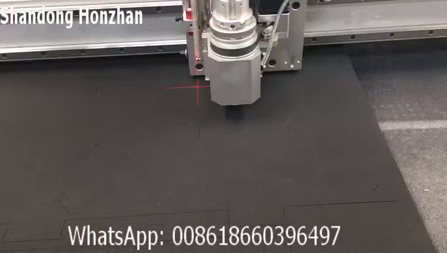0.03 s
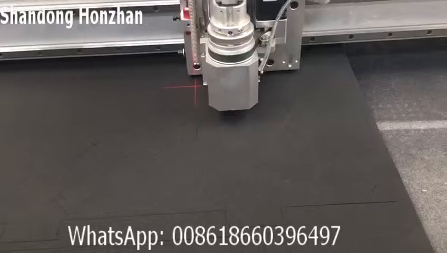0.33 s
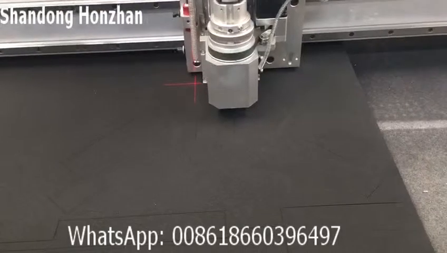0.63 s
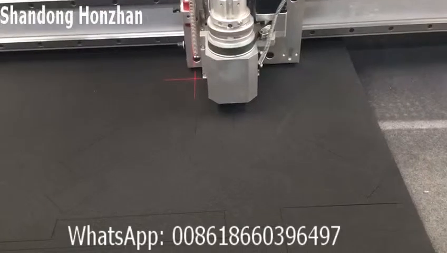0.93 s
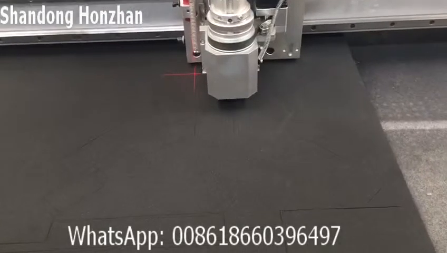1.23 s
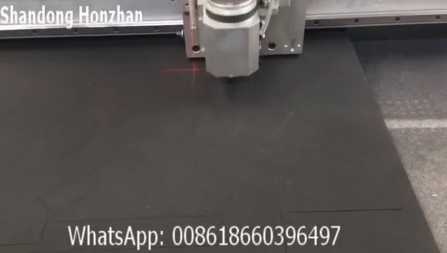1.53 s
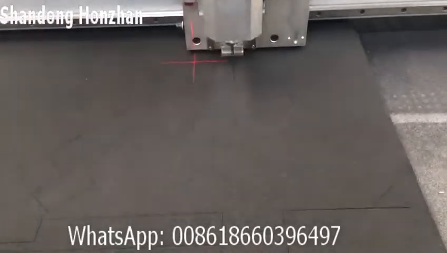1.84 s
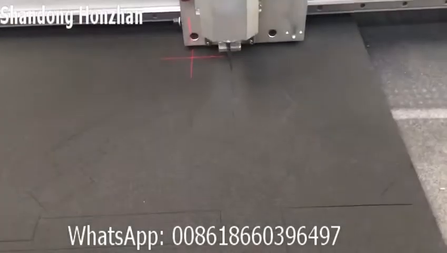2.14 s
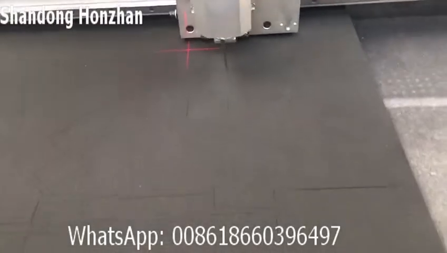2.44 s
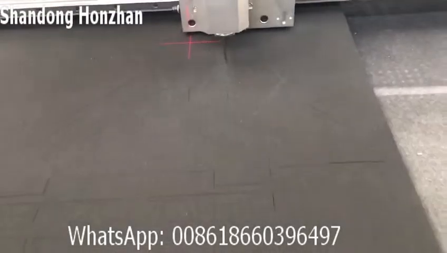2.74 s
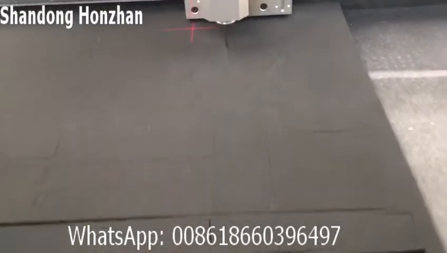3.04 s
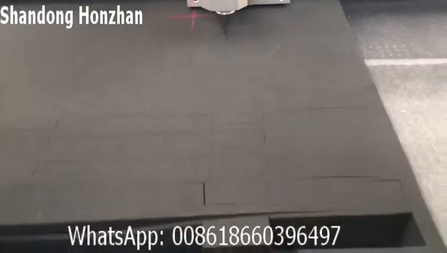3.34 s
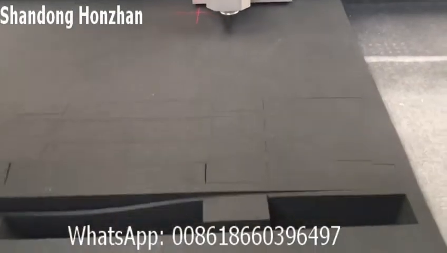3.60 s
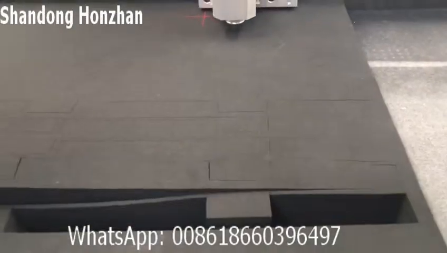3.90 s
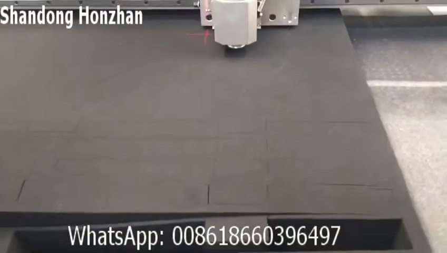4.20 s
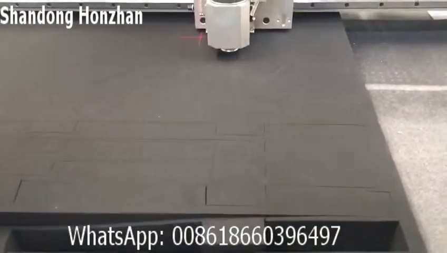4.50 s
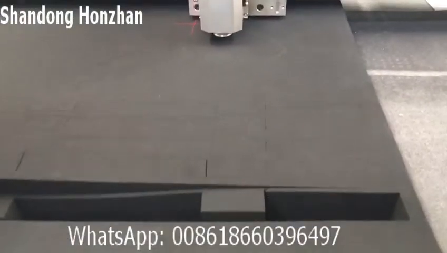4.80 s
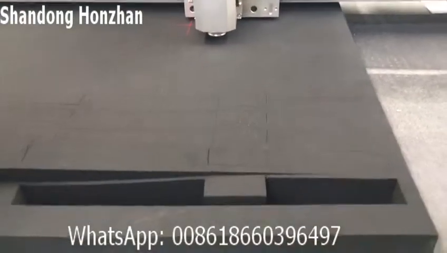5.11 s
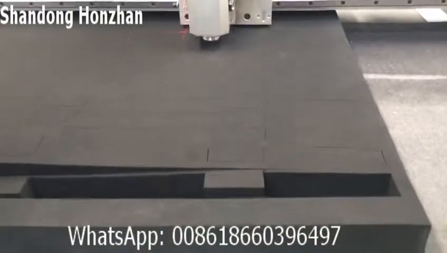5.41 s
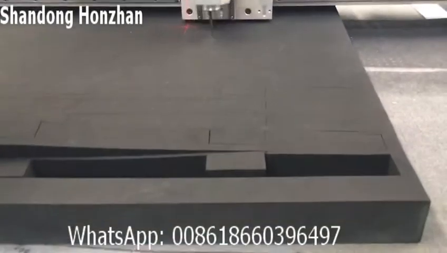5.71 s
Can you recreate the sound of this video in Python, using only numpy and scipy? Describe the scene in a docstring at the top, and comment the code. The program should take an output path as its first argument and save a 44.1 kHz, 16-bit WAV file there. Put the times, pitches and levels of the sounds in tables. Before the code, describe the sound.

An oscillating knife machine cuts foam with a fast, steady chatter over a low vacuum drone and fuzzy motor whines.

```python
"""Oscillating knife cutting foam

A CNC table cuts a foam sheet at about 21 strokes a second, over the drone of its vacuum bed.
The knife knocks and chatters at both ends of each stroke, rasps in its guide and drags in the foam.
The gantry shakes, and fuzzy drive whines shift as the head travels. A narrow-band recorder that
drops samples mirrors the whole sound into a thin sizzle high in the treble."""
import sys
import numpy as np
from scipy import signal
from scipy.fft import rfft, irfft, next_fast_len
from scipy.io import wavfile
from scipy.ndimage import uniform_filter1d

SR = 44100
rng = np.random.default_rng(int(sys.argv[2]) if len(sys.argv) > 2 else 0)


def inscribe(sig):
    """Save sig as 16-bit PCM at rate SR to the path in sys.argv[1].

    A 1-D sig is mono; a 2-D sig holds one channel per row.
    Samples are clipped to [-1, 1] before scaling.
    """
    pcm = np.round(np.clip(np.atleast_2d(sig).T, -1, 1) * 32767)
    wavfile.write(sys.argv[1], SR, pcm.astype(np.int16))


N = 262395
TIME = np.arange(N) / SR
SKIP_S = 5.423  # the sound jumps half a stroke here

# tone colour of the air rushing through the bed: f/Hz, relative level/dB
RUSH_SPECTRUM = [(8, -13), (20, 1), (35, -4.5), (70, -6), (103, -3.5), (122, -10.5), (140, -15),
                 (250, -18.5), (370, -17), (480, -15.5), (600, -12.5), (850, -19), (1150, -18),
                 (1900, -15.5), (2500, -15), (3200, -16)]
# irregular swells and dips in the loudness of the low drone: t/s, gain/dB
DRONE_LEVEL = [(.4, -3), (.68, 0.5), (.82, -2.5), (1.03, 4.5), (1.25, 1), (1.42, -7.5), (1.72, 7.5),
               (1.85, 1), (2.3, 1), (2.45, -8), (2.58, 3), (3.3, -4), (3.65, 2), (4.05, -1.5), (4.6, 2.5),
               (4.77, -8.5), (5.08, 4.5), (5.6, -9), (5.82, 6.5), (5.95, 2)]
# shaking of the gantry: multiple of the stroke rate, level/dB
SHAKE_HARMONICS = [(1, -49), (2, -59.5), (3, -57), (4, -55.5), (5, -70.5), (6, -61.5)]
# resonances of the cutting head: f/Hz, width/Hz, level/dB
HEAD_MODES = [(778, 32, -68.5), (960.5, 42, -66), (1366, 120, -63.5), (1521, 160, -62.5), (1685, 93, -58.5),
              (1782, 170, -60), (2333, 130, -58)]
# the head's hum, easing after the long run across the sheet: t/s, gain/dB
HUM_FADER = [(.4, -1.5), (1.2, -0.5), (1.5, 0), (3.2, 0), (4.4, 0), (4.9, 1), (5.2, -1), (5.95, -4.5)]
# low drive whine, strongest on the long run: t/s, f/Hz, level/dB
LOW_DRIVE = [(.4, 2050, -58.5), (1.1, 2017, -55), (1.6, 2020, -57.5), (1.9, 2007, -53.5), (2.25, 2012, -55),
             (3, 2054, -50.8), (3.5, 2050, -51.5), (4.05, 2018, -54), (4.25, 2036, -51), (4.8, 2054, -53),
             (4.97, 2013, -62.5)]
# middle drive whine, swelling and sliding down near the end: t/s, f/Hz, level/dB
MID_DRIVE = [(.45, 2200, -49), (.8, 2222, -55), (1.05, 2225, -50.5), (1.3, 2223, -52), (2.2, 2215, -55.5),
             (2.5, 2250, -61.5), (2.75, 2278, -57.5), (3.8, 2281, -56), (4.1, 2271, -57),
             (4.8, 2269, -58.5), (4.95, 2260, -50), (5.25, 2145, -48), (5.45, 2115, -53.5),
             (5.95, 2103, -52.5)]
# faint top drive whine with one brief squeal: t/s, f/Hz, level/dB
TOP_DRIVE = [(.4, 2454, -60), (3, 2451, -66), (4.8, 2450, -57.5), (5.1, 2430, -54.5), (5.36, 2436, -64),
             (5.48, 2524, -50), (5.62, 2485, -59)]
# steady hollow under the low whine: f/Hz, width/Hz, depth/0-1
STEADY_NOTCH = (1873, 43, 0.42)
# deep hollow moving just under the middle whine: t/s, f/Hz
DEEP_NOTCH = [(.4, 2094), (.9, 2140), (2.3, 2130), (2.7, 2152), (4.3, 2152), (4.85, 2150), (5.25, 1970),
              (5.6, 1915), (5.95, 1900)]
# hollow moving above the middle whine: t/s, f/Hz, depth/0-1
UPPER_NOTCH = [(.4, 2390, 0), (1.199, 2404, 0.8), (1.9, 2410, 0.7), (2.5, 2416, .05), (3.3, 2470, .5),
               (4, 2450, 0), (4.4, 2387, .45), (5, 2374, .1), (5.349, 2280, .45), (5.801, 2235, 0.7),
               (5.95, 2260, .85)]
# the blade drags in the foam: centre t/s, length/s, f/Hz, level/dB
FOAM_DRAGS = [(0.554, 0.063, 2225, -51.5), (1.434, 0.082, 1700, -55), (2.621, 0.089, 2324, -53),
              (3.372, 0.1, 1613, -53.5), (3.927, 0.093, 1723, -56.5), (4.693, 0.068, 1725, -51.5),
              (5.219, .15, 2166, -52), (5.48, 0.064, 2470, -50.5)]
# the blade rubs in its guide: f/Hz, width/Hz, level/dB
RASP_BANDS = [(609.5, 130, -59), (262.9, 220, -62.5), (1003, 1000, -59.5), (1439, 490, -56)]
# knife speed, sagging a little in mid-cut: t/s, stroke rate/Hz
STROKE_RATE = [(0.4, 20.813), (1.15, 20.61), (2.35, 20.497), (3.05, 20.609), (3.75, 20.512), (4.75, 20.566),
               (5.05, 20.782), (5.95, 20.767)]
# a thump and three chatter rings at the bottom turn, then a sharper thump and one ring at the top:
# delay after the bottom turn/strokes, f/Hz, attack/s, hold/s, decay/s, level/dB
KNIFE_RINGS = [(.001, 214.3, .0031, 0.0013, .0031, -43), (-.031, 617, .0015, .0059, .0016, -41.5),
               (.054, 487, .0046, .0011, .003, -51.5), (.066, 746, 0.0059, .0005, .0008, -50.5),
               (0.499, 203.8, 0.00064, 0.00014, 0.0041, -37), (0.5, 628, 0.00033, 0.0015, 0.0068, -49)]
# bottom turns that knock harder or softer than the rest: t/s, gain/dB
STROKE_ACCENTS = [(.52, 0.5), (1.576, 3), (1.772, 2), (1.819, 3.5), (2.648, 3), (2.76, -4), (3.09, 2.5),
                  (4.11, -4.5), (4.3, 0), (4.448, 5), (4.496, 2.2), (4.886, 2.5), (5.126, 3), (5.272, 1.4),
                  (5.319, 2), (5.37, 1), (5.729, 1.3)]
# narrow pass band of the recorder: f/Hz, gain/dB
RECORDER_BAND = [(0, 0), (2490, 0), (2540, -6), (2580, -15), (2750, -21), (2900, -32), (2990, -46),
                 (3600, -54), (9000, -62)]


def gain_of(db):
    """Decibels to amplitude."""
    return 10 ** (np.asarray(db) / 20)


def unit_rms(x):
    """Scales to rms 1."""
    return x / np.sqrt(np.mean(x ** 2) + 1e-20)


def automation(table):
    """One curve for each column after the time, in straight lines between the points."""
    times, *columns = np.transpose(table)
    return np.squeeze([np.interp(TIME, times, column) for column in columns])


def equalised(x, points):
    """Filters by a curve of (f/Hz, gain/dB) points."""
    hz, db = np.transpose(points)
    size = next_fast_len(N + 8192)
    bins = np.fft.rfftfreq(size, 1 / SR)
    curve_db = np.interp(np.log(bins + 1), np.log(hz + 1), db)
    return irfft(rfft(x, size) * gain_of(curve_db), size)[:N]


def drift(rate):
    """Random wander of rms 1 that turns about rate times a second."""
    knots = rng.standard_normal(4096)
    return unit_rms(np.interp(TIME * rate, np.arange(len(knots)), knots))


def oscillator(hz):
    """Complex tone at a steady or gliding pitch."""
    return np.exp(2j * np.pi * np.cumsum(hz * np.ones(N)) / SR)


def ringing_noise(hz, width, steady=0):
    """Noise of rms 1 in a steep resonance that may glide; steady (0-1) evens out its swells."""
    pole = np.exp(-np.pi * width / SR)
    noise = rng.standard_normal(N) + 1j * rng.standard_normal(N)
    band = signal.lfilter([1], [1, -2 * pole, pole * pole], noise)
    power = uniform_filter1d(abs(band) ** 2, size=1024) + 1e-12
    return unit_rms((band / power ** (steady / 2) * oscillator(hz)).real)


def notch(x, hz, width, depth):
    """Scoops out a narrow band that may glide."""
    carrier, pole = oscillator(hz), np.exp(-np.pi * width / SR)
    band = carrier * signal.lfilter([1 - pole], [1, -pole], x / carrier)
    return x - 2 * depth * band.real


def hollowed(x, width_hz=66):
    """Three narrow hollows around the whines: one steady, two moving."""
    upper_hz, upper_depth = automation(UPPER_NOTCH)
    x = notch(x, upper_hz, width_hz, upper_depth)
    x = notch(x, *STEADY_NOTCH)
    return notch(x, automation(DEEP_NOTCH), width_hz, depth=.99)


def reflected(x, count=6, first_s=.005, last_s=.022, shift_s=.00012):
    """Table and gantry throw back weak echoes whose paths shift as the head travels."""
    echoes = 0
    for delay in np.linspace(first_s, last_s, count):
        path_s = delay * rng.uniform(.9, 1.1) + shift_s * drift(2.5)
        echoes += np.interp(TIME - path_s, TIME, x)
    wet = gain_of(-3.5)
    return (x + wet * echoes / np.sqrt(count)) / np.hypot(1, wet)


def vacuum_bed():
    """Air drawn through the bed: a wide rush over a low drone that swells and dips irregularly."""
    rush = unit_rms(equalised(rng.standard_normal(N), RUSH_SPECTRUM))
    drone = gain_of(automation(DRONE_LEVEL)) * ringing_noise(hz=90.34, width=30, steady=.45)
    return gain_of(-39) * rush + gain_of(-52.5) * drone


def gantry_rumble(start_s=2.38, end_s=4.6, attack_s=.061, release_s=.08, fade_db_per_s=5):
    """A faint rumble that swells as the gantry starts its long run, then sinks back."""
    gate = np.clip((TIME - start_s) / attack_s, 0, 1) * np.clip(1 - (TIME - end_s) / release_s, 0, 1)
    elapsed = np.clip(TIME, start_s, end_s) - start_s
    idle, run = gain_of(-64.5), gate * gain_of(-48 - fade_db_per_s * elapsed)
    return np.hypot(idle, run) * ringing_noise(hz=61.9, width=12, steady=.45)


def gantry_shake(strokes, waver_db=2, sway_hz=14):
    """The moving mass shakes the gantry at multiples of the stroke rate, over a slower frame sway."""
    shake = 0
    for harmonic, db in SHAKE_HARMONICS:
        level = gain_of(db + waver_db * drift(5.4))
        shake += level * np.cos(2 * np.pi * (harmonic * strokes + rng.random()))
    sway = gain_of(-53) * np.sin(2 * np.pi * (sway_hz * TIME + rng.random()))
    return np.sqrt(2) * (shake + sway)


def drive_whine(table, width):
    """A drive's fuzzy whine, gliding and swelling without a break."""
    hz, db = automation(table)
    return gain_of(db) * ringing_noise(hz, width, steady=.39)


def cutting_head(wander_hz=15, flutter_db=1.55):
    """The head hums in its wandering resonances under three drive whines; all flutter together."""
    modes = sum(gain_of(db) * ringing_noise(hz + wander_hz * drift(3), width)
                for hz, width, db in HEAD_MODES)
    hum = gain_of(automation(HUM_FADER)) * reflected(modes)
    whines = drive_whine(LOW_DRIVE, width=95) + drive_whine(MID_DRIVE, width=95)
    whines += drive_whine(TOP_DRIVE, width=58)
    return gain_of(flutter_db * drift(60)) * (hum + whines)


def foam_scrapes(strokes):
    """Short rough swells as the blade drags, pulsing at both turns of the stroke."""
    pulse = unit_rms(1 + .2 * np.cos(4 * np.pi * strokes))
    scrapes = 0
    for centre, length, hz, db in FOAM_DRAGS:
        swell = gain_of(db) * np.exp(-2 * ((TIME - centre) / length) ** 2)
        scrapes += swell * ringing_noise(hz, width=240, steady=.39)
    return pulse * scrapes


def guide_rasp(strokes, lag_strokes=.025, spread_strokes=.085):
    """The blade rubs in its guide, hardest around the bottom turn and less around the top."""
    def press(turn):
        distance = (strokes - turn - lag_strokes + .5) % 1 - .5
        return np.exp(-.5 * (distance / spread_strokes) ** 2)
    pressure = unit_rms(.15 + press(0) + .6 * press(.5))
    return pressure * sum(gain_of(db) * ringing_noise(hz, width) for hz, width, db in RASP_BANDS)


def knife_knocks(strokes, jitter_s=.00008, uneven_db=.37, detune=.0073):
    """Each reversal of the blade thumps and chatters: rings swell, hold and die, never twice alike."""
    knocks, rate = np.zeros(N), automation(STROKE_RATE)
    variation, accent_db = rng.standard_normal((256, 3)), np.zeros(256)
    for when, db in STROKE_ACCENTS:
        accent_db[round(np.interp(when, TIME, strokes))] = db
    for delay, hz, attack, hold, decay, db in KNIFE_RINGS:
        stroke = np.round(strokes - delay).astype(int)
        late, force, sharp = variation[stroke].T
        age = (strokes - delay - stroke) / rate - jitter_s * late
        envelope = np.exp(-.5 * (np.minimum(age, 0) / attack) ** 2 - np.maximum(age - hold, 0) / decay)
        at_bottom = abs(delay) < 1 / 4
        level = gain_of(db + uneven_db * force + accent_db[stroke] * at_bottom)
        knocks += level * envelope * np.cos(2 * np.pi * hz * (1 + detune * sharp) * age)
    return knocks


def scene():
    """The whole machine, heard in mono from near the table."""
    # running stroke count: whole numbers are the bottom turns
    strokes = np.cumsum(automation(STROKE_RATE)) / SR - .601 + .5 * (TIME > SKIP_S)
    beat = knife_knocks(strokes) + gantry_shake(strokes) + gantry_rumble()
    texture = vacuum_bed() + reflected(guide_rasp(strokes)) + cutting_head() + foam_scrapes(strokes)
    machine = beat + hollowed(texture)
    return np.array([machine, machine])


def record(dry, start_s=.394, rise_s=.004, slip_s=.00018, tick_decay_s=.00024, cutoff_hz=15755):
    """A narrow-band recorder cuts in and drops samples, mirroring the sound around SR / 3 as sizzle."""
    narrow = np.array([equalised(channel, RECORDER_BAND) for channel in dry])
    slot = np.arange(N) % 3
    keep = np.array([slot < 2, slot < 1])  # of three samples, the left keeps two and the right one
    # the count of three slips by one at the skip, with a faint tick
    slipped = np.clip((TIME - SKIP_S) / slip_s, 0, 1)
    gate = (1 - slipped) * keep + slipped * np.roll(keep, -1, axis=1)
    tick = gain_of(-46) * (TIME > SKIP_S) * np.exp(-abs(TIME - SKIP_S) / tick_decay_s)
    hiss = gain_of(-99) * rng.standard_normal(N)
    fade_in = np.clip((TIME - start_s) / rise_s, 0, 1)
    mix = fade_in * (gain_of(6) * narrow * gate + hiss + tick)
    lowpass = signal.firwin(1023, cutoff_hz, window=("kaiser", 9), fs=SR)
    return signal.oaconvolve(mix, lowpass[None], "same")


dry = scene()
out = record(dry)
inscribe(out)
```